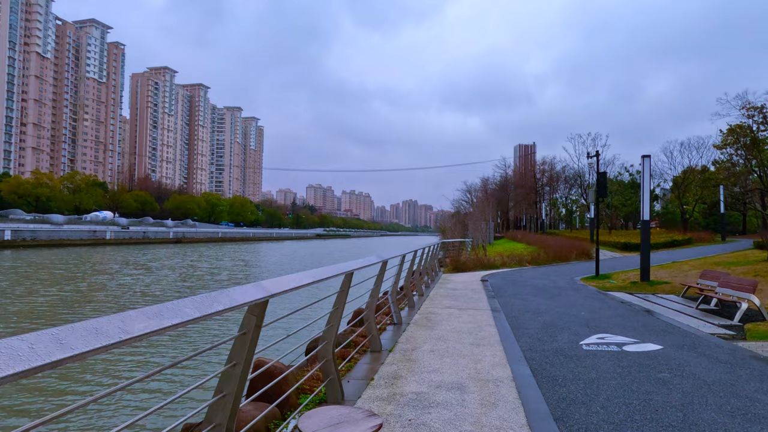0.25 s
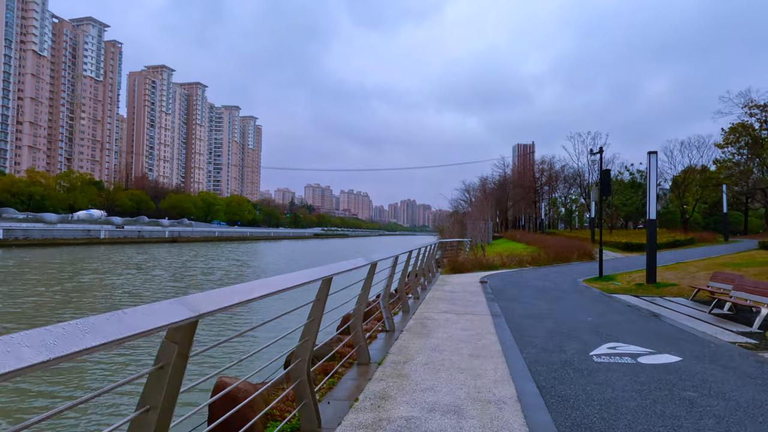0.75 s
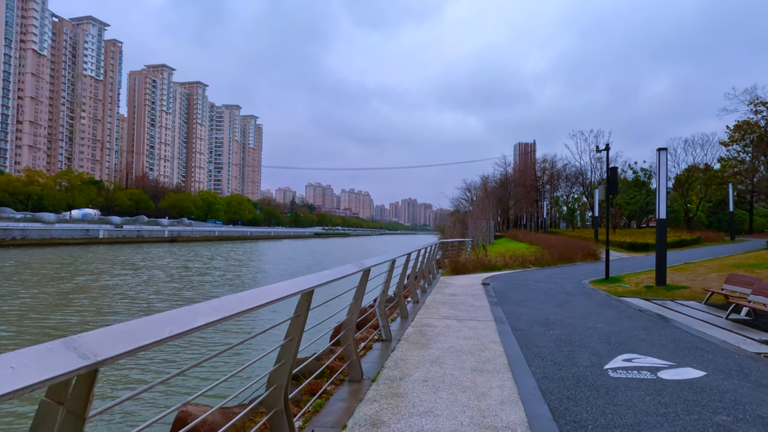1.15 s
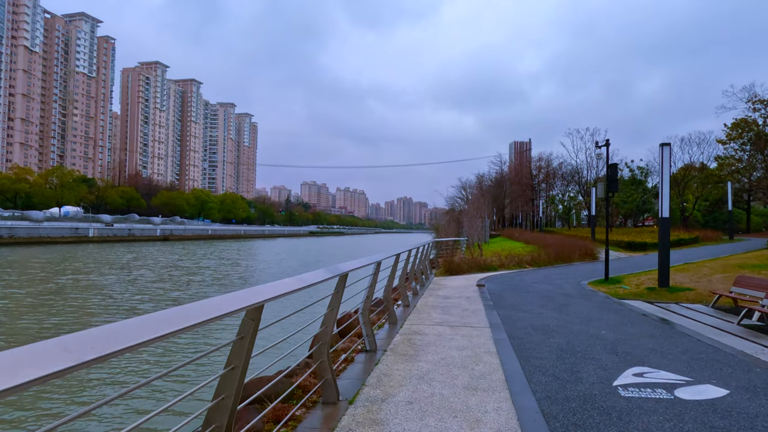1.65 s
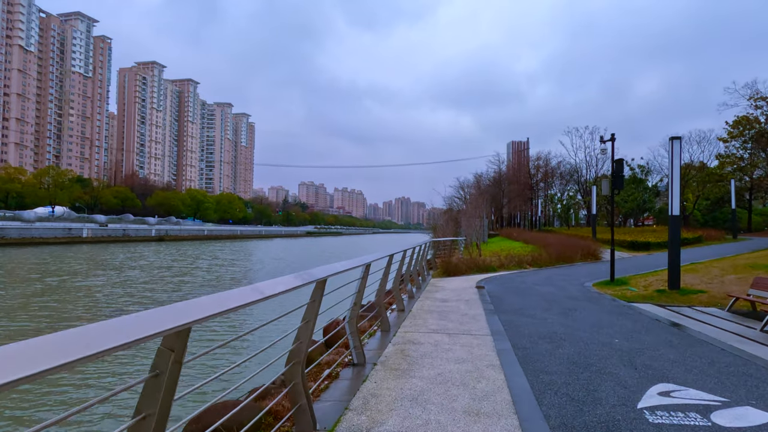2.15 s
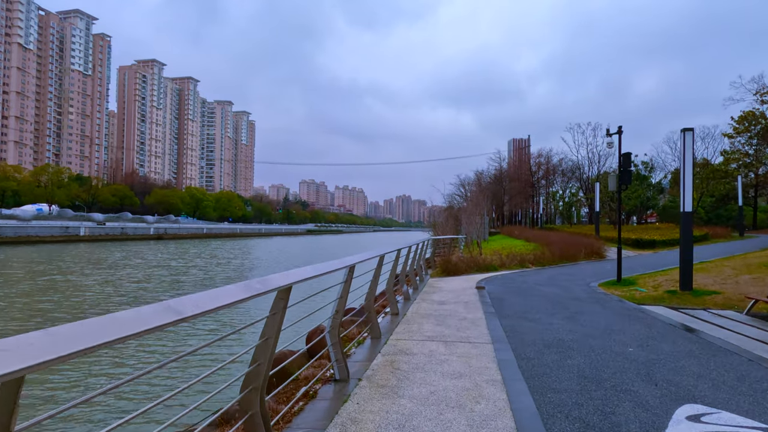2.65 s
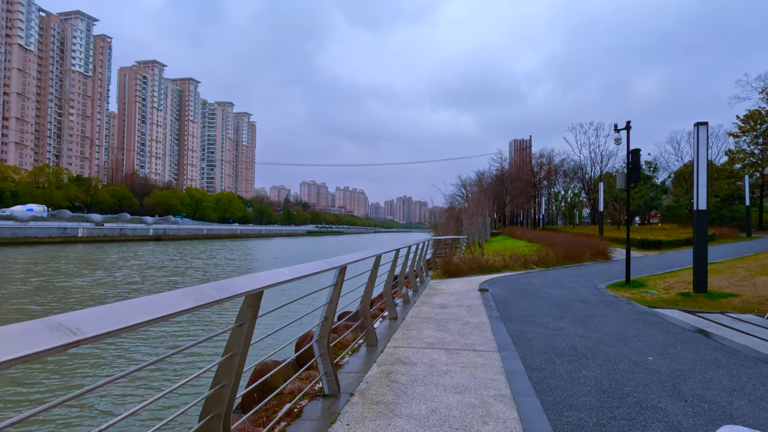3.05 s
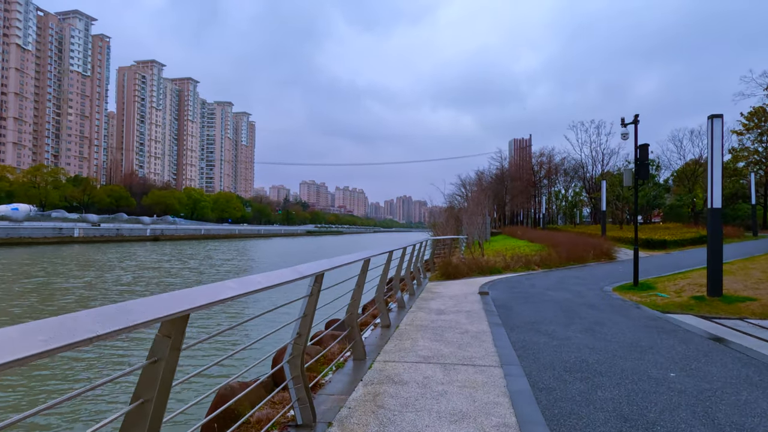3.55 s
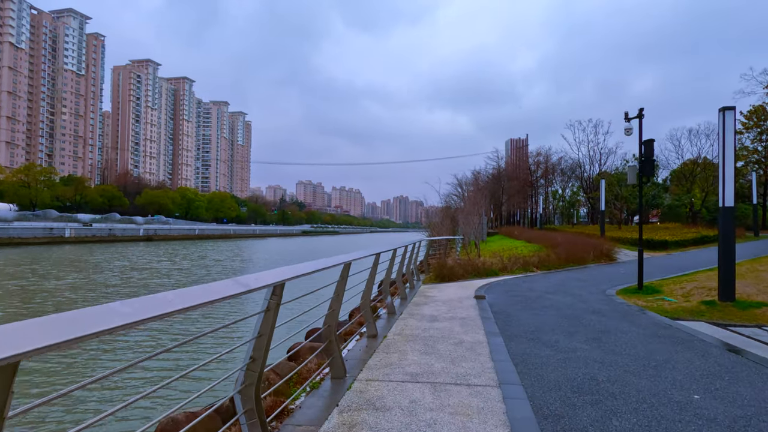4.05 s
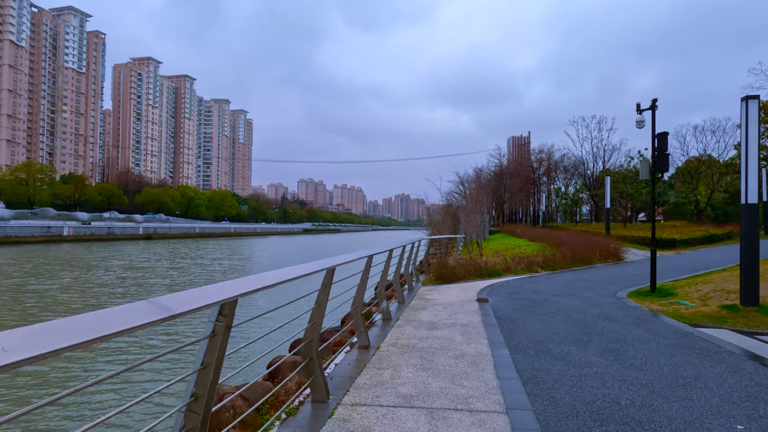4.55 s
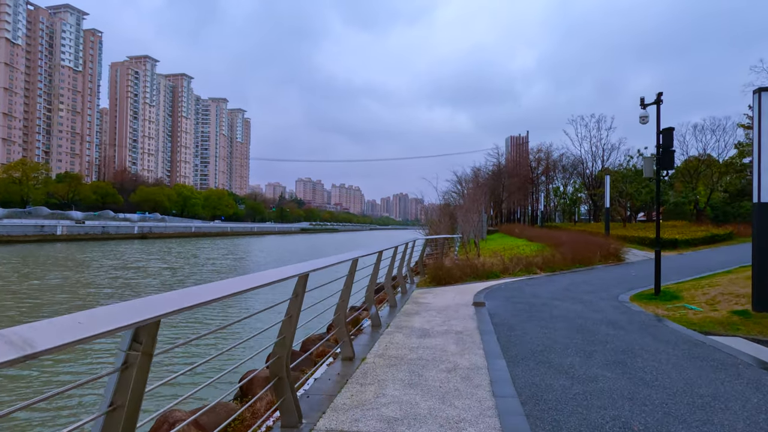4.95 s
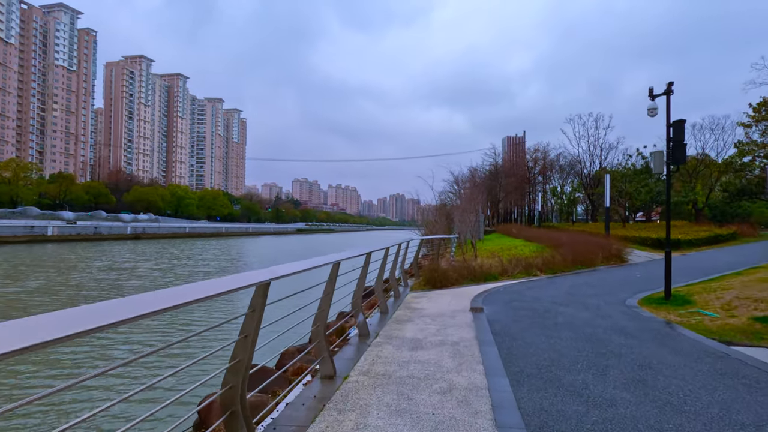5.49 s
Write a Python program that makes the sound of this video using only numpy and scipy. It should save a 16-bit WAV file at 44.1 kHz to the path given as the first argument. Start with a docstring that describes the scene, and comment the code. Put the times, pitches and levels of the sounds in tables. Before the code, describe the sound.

For under six seconds, a continuous bed of distant city traffic is heard in stereo from an open riverside path. Deep exhaust rumble dominates, fluttering unevenly, with a much quieter, dull tyre roar around the middle range and a soft, thin hiss above, both leaning left. A far idling engine adds a low wavering hum that swells and sinks throughout. Very faint, brief, blurred whistles appear near 0.6 s, between 1.5 and 1.8 s, and near 3.6 s. At about 2.9 s a distant car horn gives one short, thin, reedy toot of about 0.3 s, followed by duller echoes from tower blocks until about 3.7 s; the tyre hiss lifts slightly here. From about 3.7 s a heavy diesel draws nearer, its deep throbbing drone growing in uneven surges and creeping up in pitch, strongest from 4.7 s to the end. Nothing sounds close.

```python
"""Busy city roads beyond the water, somewhat to the left, heard from a riverside path by two microphones.
Exhausts rumble, tyres roar near 1 kHz and hiss above: coloured noise in nine flickering layers.
A far idling engine and another hum sound as wavering lines; a heavy diesel nears with a deep drone.
One car horn toots its upper harmonics and echoes off the tower blocks; faint thin whistles come and go."""
import sys
import numpy as np
from scipy import signal
from scipy.fft import rfft, irfft
from scipy.io import wavfile
from scipy.ndimage import uniform_filter1d

SR = 44100
rng = np.random.default_rng(int(sys.argv[2]) if len(sys.argv) > 2 else 0)


def wav_out(sig):
    """Save sig, one row per channel (or a flat mono array), as 16-bit PCM at SR to the path in sys.argv[1]."""
    wavfile.write(sys.argv[1], SR, np.round(np.clip(np.atleast_2d(sig).T, -1, 1) * 32767).astype(np.int16))


N = 252252


def undb(db):
    """Decibels to amplitude gain."""
    return 10 ** (np.asarray(db) / 20)


def clock():
    """Time of every sample in seconds."""
    return np.arange(N) / SR


def curves(table):
    """Columns of a table joined by straight lines in time."""
    seconds, *columns = np.transpose(table)
    return [np.interp(clock(), seconds, column) for column in columns]


def on_log(hz, table):
    """Columns of a table joined by straight lines over log frequency."""
    table_hz, *columns = np.transpose(table)
    return [np.interp(np.log(hz + 1), np.log(table_hz), column) for column in columns]


def unit(x):
    """Scale to rms 1."""
    return x / np.sqrt(np.mean(x ** 2))


def walk(rate):
    """Random levels held 1 / rate s and slewed twice; spread near 1."""
    hold = int(SR / rate)
    held = np.repeat(rng.standard_normal(N // hold + 1), hold)
    slewed = uniform_filter1d(uniform_filter1d(held, hold), hold)
    return 1.08 * slewed[:N]


def gate(start, end, fade):
    """A smooth window that opens from start and is shut by end, with fades in seconds."""
    t = clock()
    opening = np.clip(np.minimum(t - start, end - t) / fade, 0, 1)
    return np.sin(np.pi / 2 * opening) ** 2


def waver(hz, rate, swing, wander_db):
    """A sine whose phase wanders by swing rad at rate per s, its level twice as fast about rms 1."""
    steady_phase = 2 * np.pi * np.cumsum(hz + 0 * clock()) / SR
    phase = steady_phase + swing * walk(rate) + rng.uniform(0, 2 * np.pi)
    return np.sqrt(2) * np.sin(phase) * undb(wander_db * walk(2 * rate))


def blur(hz, width):
    """A line smeared by many paths through moving air: a narrow band of noise, rms 1."""
    bin_hz = np.arange(N // 2 + 1) * SR / N
    band = np.exp(-((bin_hz - hz) / width) ** 2)
    return unit(irfft(rfft(rng.standard_normal(N)) * band, N))


def whistles():
    """Faint, brief high tones, each blurred into a narrow band of noise."""
    # Each row: start in seconds, length in seconds, pitch in Hz, level in dB.
    whistle_rows = [(.56, .1, 5500, -78), (1.48, .1, 3520, -69), (1.55, .08, 3230, -67),
                    (1.7, .08, 3150, -65), (3.57, .25, 4270, -72)]
    return sum(undb(db) * blur(hz, 20.) * gate(start, start + length, .04)
               for start, length, hz, db in whistle_rows)


def hums():
    """Narrow wavering lines: overtones of a far idling engine near 19 Hz, and another hum at 281 Hz."""
    # Other hum lines: 76 and 114 Hz are overtones of the idling engine, 281 Hz another hum.
    # Each row: pitch in Hz, wander rate per second, level in dB, start and end in seconds.
    other_lines = [(114, 2., -44, 0., .9), (114, 1.5, -40, 2.05, 2.8), (114, 1.5, -46, 4.4, 5.2),
                   (76, 2.5, -42, 4.2, 5.1), (76, 2.5, -35, 5.05, 5.65), (281, 2., -47.5, 2.1, 3.3),
                   (281, 2., -49, 3.7, 4.6), (281, 3., -52, 4.9, 5.5)]
    # The idling engine's 57 Hz line, swelling and sinking. Each row: time in seconds, level in dB.
    idler_level = [(0, -34), (.4, -35), (.5, -30), (.6, -42), (1.0, -40), (1.23, -33), (1.38, -44),
                   (1.47, -31), (1.8, -34), (2.15, -41), (2.45, -35), (2.75, -46), (2.84, -30), (3.05, -42),
                   (3.4, -36), (3.65, -36), (4.0, -44), (4.95, -42), (5.2, -33), (5.4, -32), (5.72, -44)]
    idler_line_hz, wander_db = 57., 2
    pan_db = 0.6  # left minus right
    out = waver(idler_line_hz, 3., .6, .8) * undb(curves(idler_level)[0])
    for hz, rate, db, start, end in other_lines:
        out = out + waver(hz, rate, 1., wander_db) * undb(db) * gate(start, end, .3)
    return out * undb(np.array([[pan_db], [-pan_db]]) / 2)


def horn():
    """Two buzzing diaphragms; their flares pass the upper harmonics, which waver in the air, then echo."""
    # Each row: pitch in Hz, start and stop in seconds, then harmonics as multiple and relative level in dB.
    pipes = [(433., 2.93, 3.23, [(4, -6), (5, -4), (6, 0), (7, -3), (8, -3), (9, -7), (10, -14),
             (11, -18)]), (533., 3.03, 3.19, [(4, -5), (5, 2), (6, -10), (7, -12)])]
    # Echoes off the tower blocks. Each row: delay in seconds, level in dB against the dulled toot.
    echoes = [(.17, -12), (.27, -1), (.38, -9), (.48, -11)]
    level_db, fade_s = -58.3, .05
    echo_top_hz, echo_pan_db, right_delay_s = 3300, 2, .004
    toot = 0
    for hz, start, end, harmonics in pipes:
        for multiple, db in harmonics:
            line = waver(multiple * hz, 20., .7, 1.5)
            toot = toot + undb(level_db + db) * line * gate(start, end, fade_s)
    # walls and air dull the echoes
    dull = signal.sosfilt(signal.butter(2, echo_top_hz, fs=SR, output="sos"), toot)
    left = sum(undb(db) * np.roll(dull, int(delay * SR)) for delay, db in echoes)
    # the echoes reach the right side weaker, by slightly longer paths
    right = np.roll(left, int(right_delay_s * SR)) * undb(-echo_pan_db)
    return toot + np.array([left, right])


def diesel():
    """A heavy diesel nearing and gathering speed: low firing orders, the higher ones wavering more."""
    # Each row: time in seconds, firing rate in Hz, overall level in dB.
    approach = [(0, 37.5, -44), (2.2, 37.5, -46), (3.4, 37.0, -43), (3.75, 37.0, -35), (3.95, 37.1, -32),
                (4.1, 37, -33), (4.22, 37.1, -28.5), (4.5, 37.5, -28.5), (4.72, 37.9, -26),
                (4.95, 38.5, -28.5), (5.2, 38.9, -24), (5.4, 39.4, -27), (5.6, 39.5, -25),
                (5.72, 39.5, -26)]
    # Each row: multiple of the firing rate, level in dB added to the overall one.
    firing_orders = [(1, 0.5), (2, -16), (4, -26), (5, -30.5)]
    firing_hz, level_db = curves(approach)
    drone = sum(undb(db) * waver(k * firing_hz, 3., .2 * k, .4 * k) for k, db in firing_orders)
    return undb(level_db) * drone


def swells():
    """Level of each layer in dB: steady, drifting slowly; the four highest layers follow the treble."""
    # Level of each layer in dB, lowest first, about which it drifts.
    layer_db = [-33, -37, -48, -49.5, -48.5, -49, -52.5, -73, -86]
    # Slow drift of each layer in dB per second, lowest first.
    drift_rates = [0.11, -0.052, -0.16, -.11, -.11, -.12, -.2, .1, -.4]
    # Swell of the treble. Each row: time in seconds, level about its mean in dB.
    treble_level = [(0, 0.2), (.7, -0.5), (1.7, 0.3), (2.7, -0.1), (3.1, 2.2), (3.6, 1.3), (4.1, -0.6),
                    (4.65, -1), (5.25, 1.5), (5.72, -.2)]
    # How far each of the four highest layers follows the treble, as a factor on its dB.
    treble_share = [.3, 0.45, .9, 1.2]
    drift = np.outer(drift_rates, clock() - N / SR / 2)
    treble = np.outer([0, 0, 0, 0, 0] + treble_share, curves(treble_level)[0])
    return np.array(layer_db)[:, None] + drift + treble


def traffic():
    """Two partly alike noises, coloured by exhausts and tyres; nine layers flicker on their own."""
    # Exhaust rumble of many vehicles, above a faint infrasonic rumble below 10 Hz. Each row: frequency in Hz,
    # relative level in dB per Hz.
    rumble = [(4, -13.5), (7, 0.5), (11, -6), (18, -9), (27, -8.5), (33, -0.5), (39, -8), (47, -3),
              (57, -7), (68, -4), (86, -11.5), (114, -10), (130, -11.5), (150, -13), (201, -12.5),
              (273, -15), (339, -21.5), (450, -31.5), (580, -46.5), (990, -120)]
    # Tyres on asphalt, dulled by distance. Each row: frequency in Hz, relative level in dB per Hz.
    tyres = [(330, -3), (400, -6.5), (520, -5), (640, -9), (810, -6), (872, -3.5), (895, 2), (950, 1),
             (1030, 0), (1100, -2), (1200, -4.5), (1350, -10.5), (1750, -11.5), (2200, -23)]
    # Thin upper hiss of the roads. Each row: frequency in Hz, relative level in dB per Hz.
    hiss = [(1900, 7), (2400, -1.5), (3100, -6), (4200, -11), (5600, -18.5), (6600, -27.5), (7600, -31.5),
            (8300, -39), (9500, -41.5), (10900, -46), (11700, -44), (12500, -47), (13500, -56.5)]
    # The two microphones. Each row: frequency in Hz, likeness 0-1, lead of the right in rad,
    # left minus right in dB.
    microphones = [(30, .995, 0, .1), (60, .998, 0, .1), (150, .992, 0, .2), (340, .96, .03, 1.1),
                   (520, .85, .21, 2.6), (720, .68, .54, .8), (1030, .66, .44, 1.7), (1400, .33, .65, 2.5),
                   (1720, .49, .54, 4.3), (2100, .71, .62, 4.0), (2900, .63, 1.05, 3.8),
                   (4100, .52, 0, 3.4), (4900, .62, -.27, 2.4), (5700, .64, -.25, 2.4),
                   (7800, .31, -.3, 3.2), (9900, .35, .3, 3.1), (10700, .13, .3, 13), (11700, .02, .3, 28),
                   (13800, .02, .3, 12)]
    # Edges between neighbouring layers in Hz, lowest first.
    layer_edges = [85, 400, 760, 970, 1300, 2200, 6500, 9300]
    # Quick wandering of each layer in dB, lowest first.
    flicker_db = [1.7, 0.29, 0.3, .6, 1.2, 0.41, 0.85, 1.1, 1.4]
    # Slower surges of each layer in dB as vehicles come and go, lowest first.
    surge_db = [.5, 1.07, .6, 1.3, 1.3, .5, .4, .3, .3]

    hz = np.arange(N // 2 + 1) * SR / N
    like, lead, pan_db = on_log(hz, microphones)
    like = np.clip(like, 0, 1)
    right_gain = undb(-pan_db)
    a, b = rfft(rng.standard_normal((2, N)))
    mid, side = a * np.sqrt(1 + like), b * np.sqrt(1 - like)
    pair = np.array([mid + side, (mid - side) * right_gain * np.exp(1j * lead)])
    # the colours describe the average of both sides
    pair = pair / np.sqrt(1 + right_gain ** 2 + 2 * right_gain * like * np.cos(lead))

    # power share above each edge; neighbouring layers cross-fade
    above = [1 / (1 + (edge / (hz + 1)) ** 16) for edge in layer_edges]
    above = [np.ones_like(hz)] + above + [0 * hz]
    colours = [rumble, rumble, tyres, tyres, tyres, tyres, hiss, hiss, hiss]
    out = 0
    for k, db in enumerate(swells()):
        share = np.sqrt(np.clip(above[k] - above[k + 1], 0, 1))
        layer = irfft(pair * share * undb(on_log(hz, colours[k])[0]), N)
        layer = layer / np.std(layer.mean(axis=0))
        moving_db = db + flicker_db[k] * walk(7.08) + surge_db[k] * walk(2.48)
        out = out + layer * undb(moving_db)
    return out


def scene():
    """Everything as it arrives at the two microphones, left and right."""
    return whistles() + hums() + horn() + diesel() + traffic()


def record(dry):
    """The recorder cuts the top with a steep low-pass."""
    top_hz = 13900
    return signal.sosfilt(signal.ellip(8, .2, 70, top_hz, fs=SR, output="sos"), dry)


dry = scene()
out = record(dry)
wav_out(out)
```